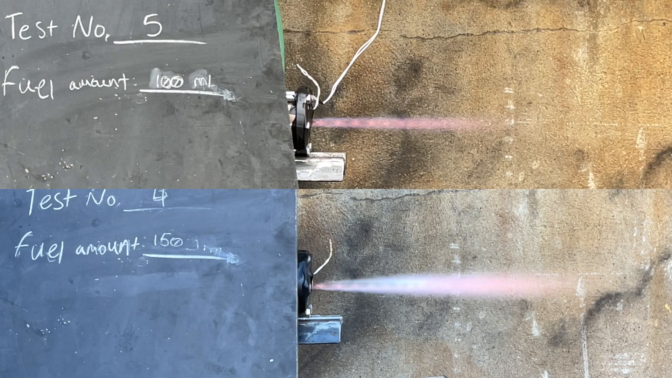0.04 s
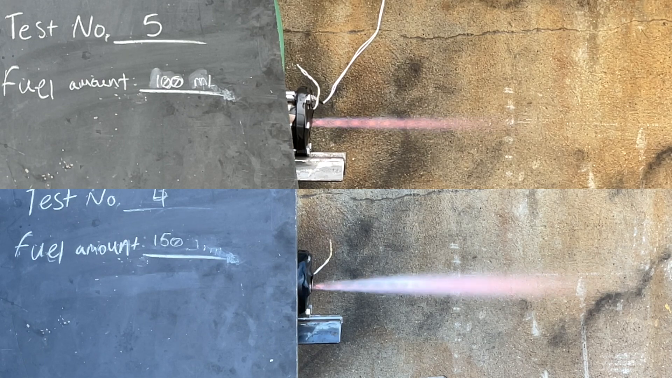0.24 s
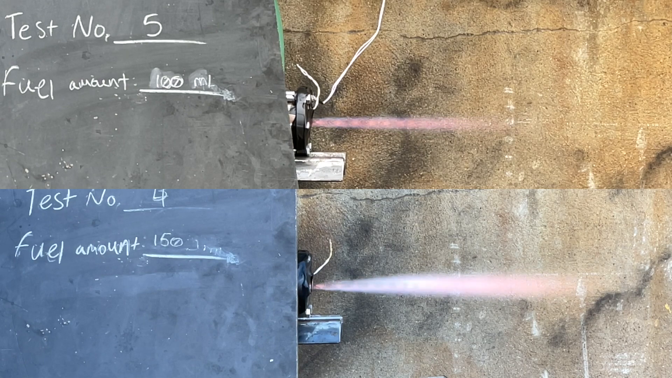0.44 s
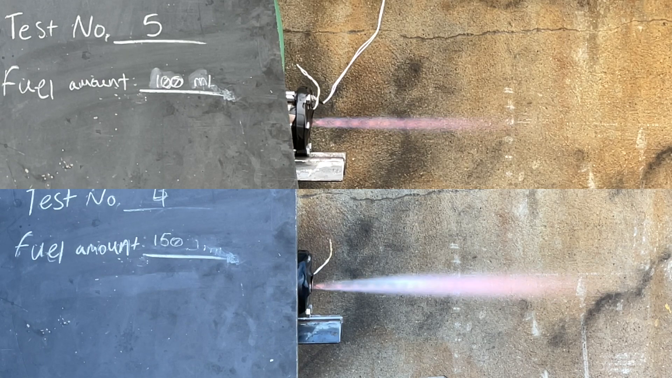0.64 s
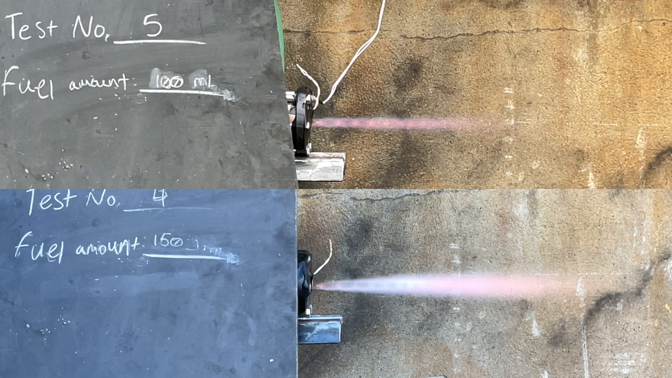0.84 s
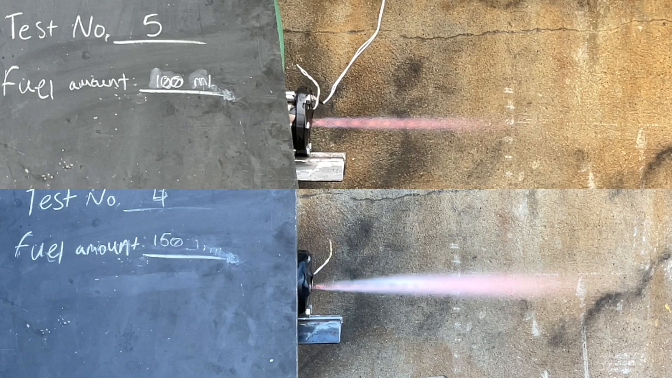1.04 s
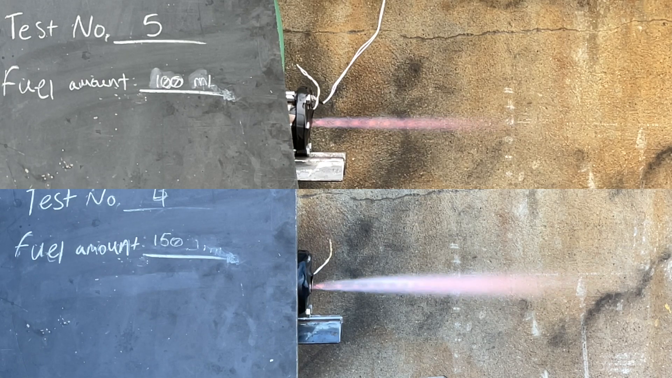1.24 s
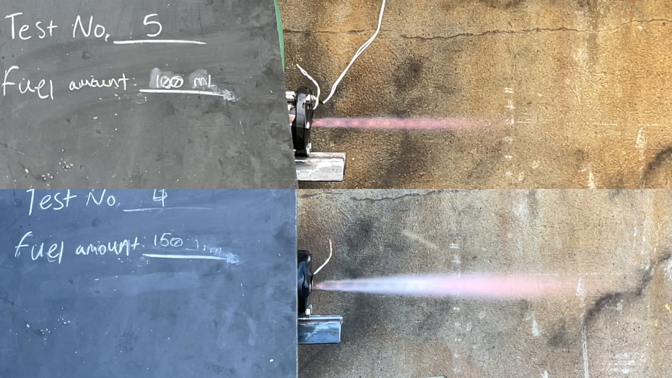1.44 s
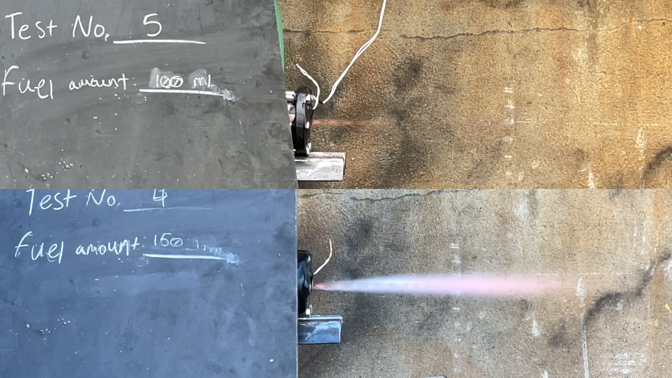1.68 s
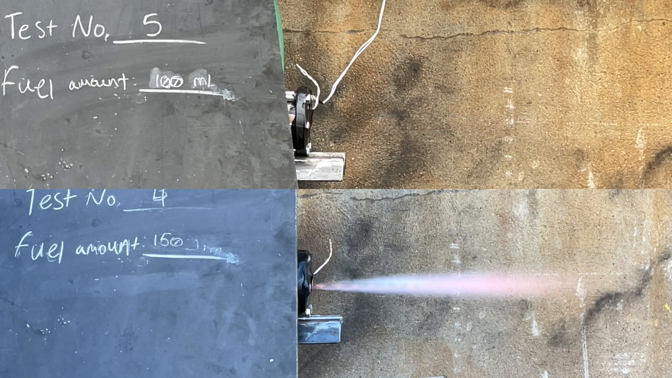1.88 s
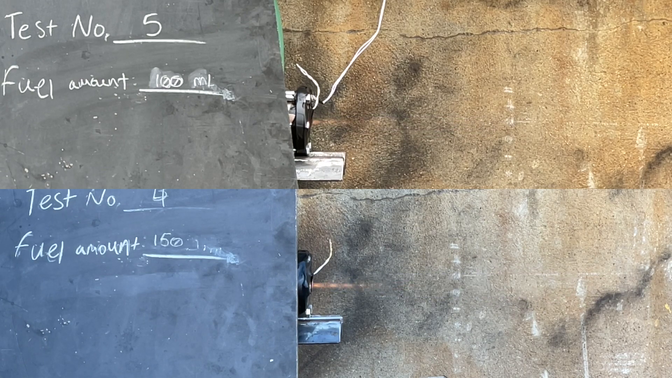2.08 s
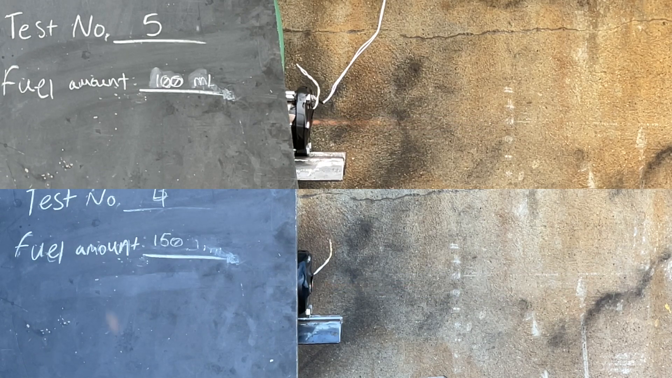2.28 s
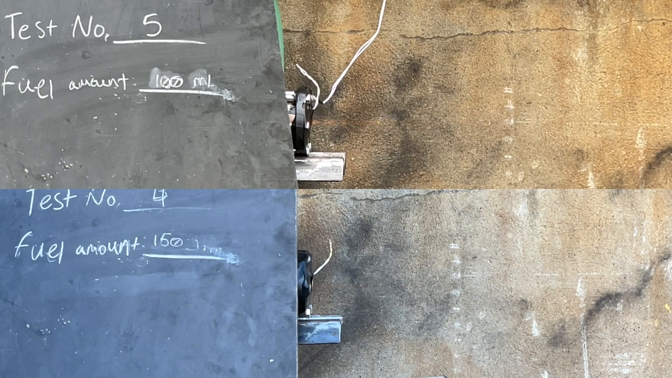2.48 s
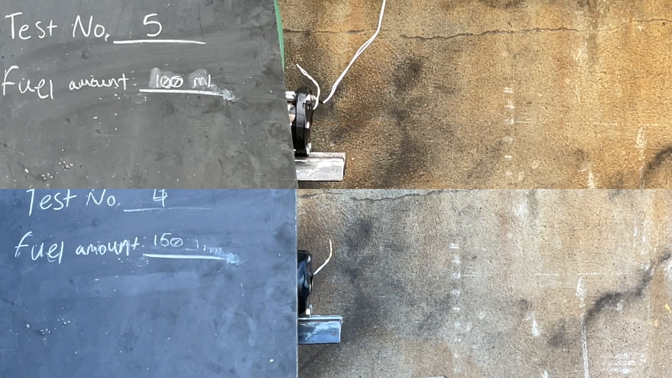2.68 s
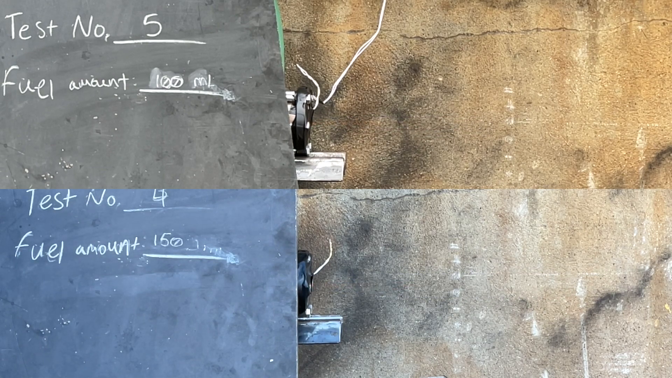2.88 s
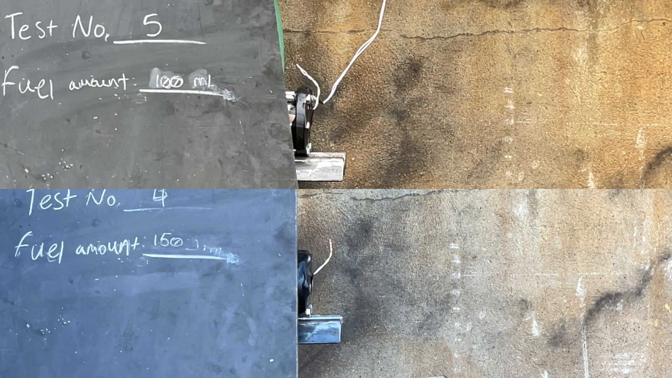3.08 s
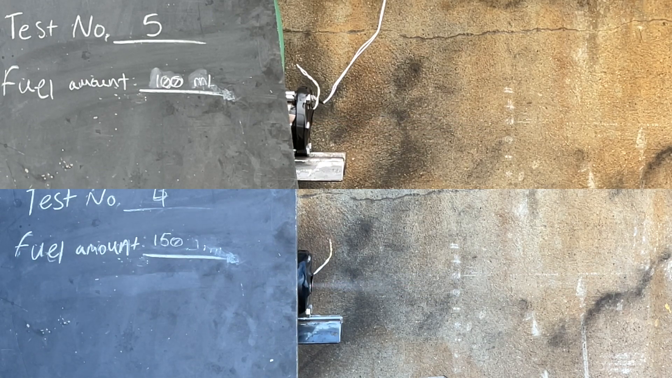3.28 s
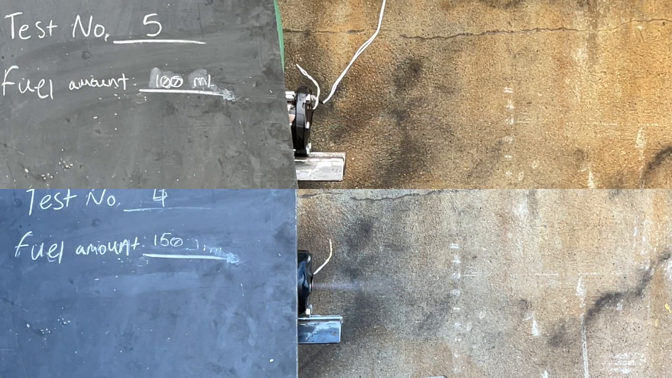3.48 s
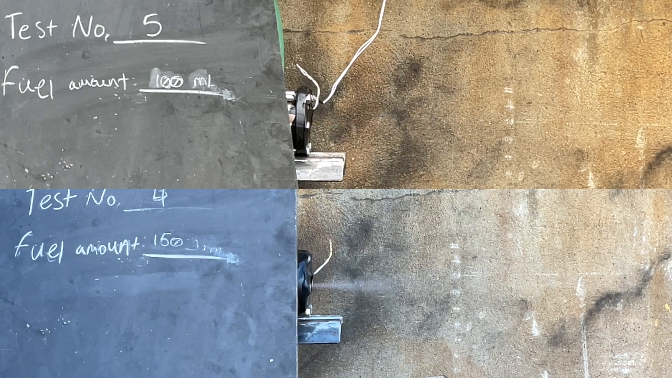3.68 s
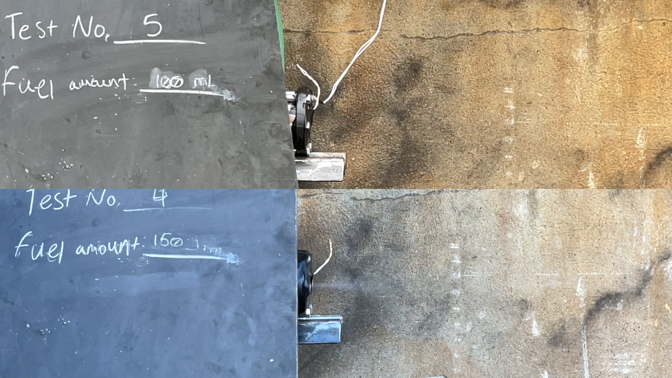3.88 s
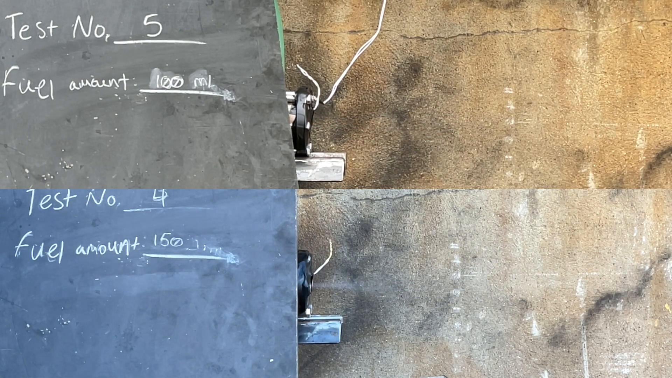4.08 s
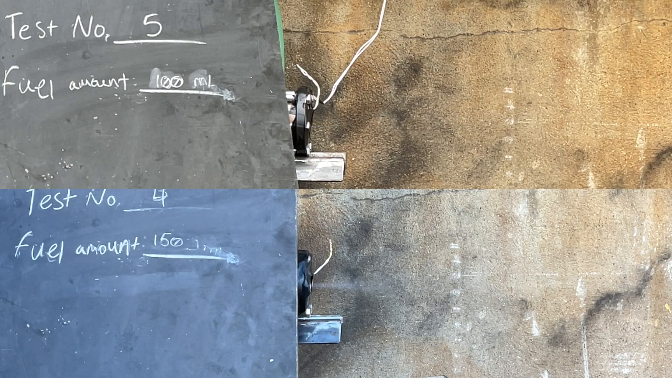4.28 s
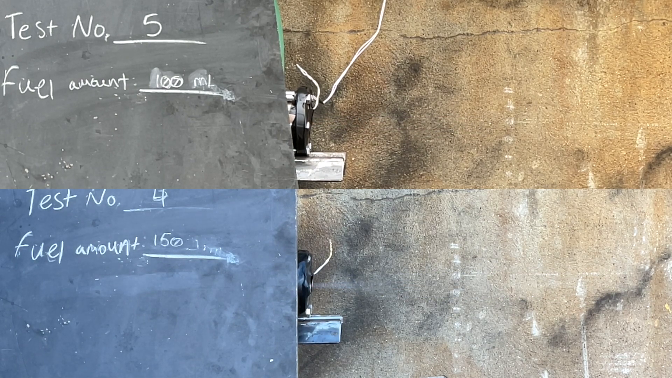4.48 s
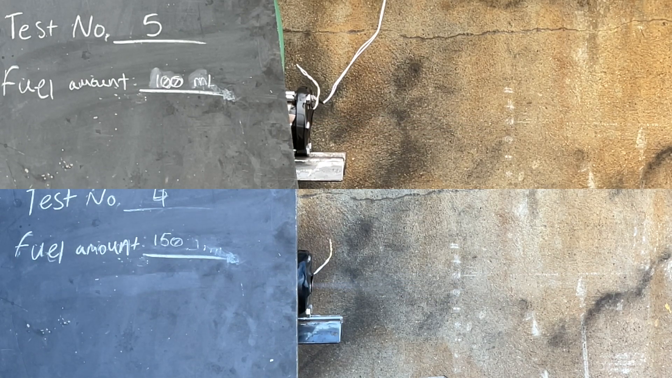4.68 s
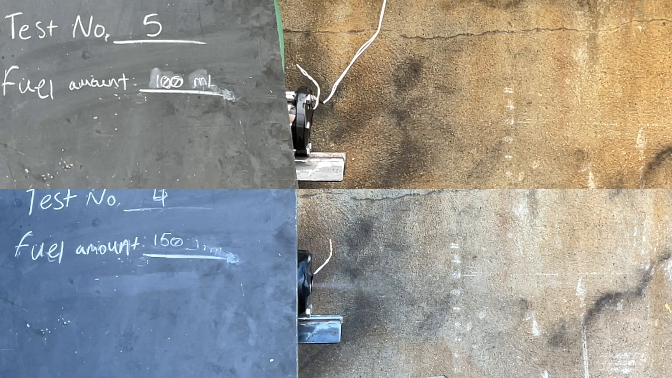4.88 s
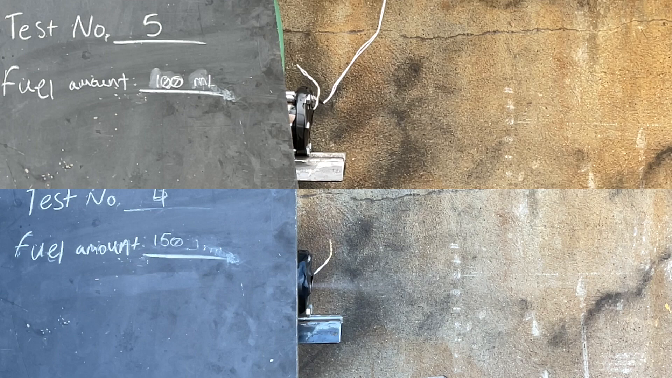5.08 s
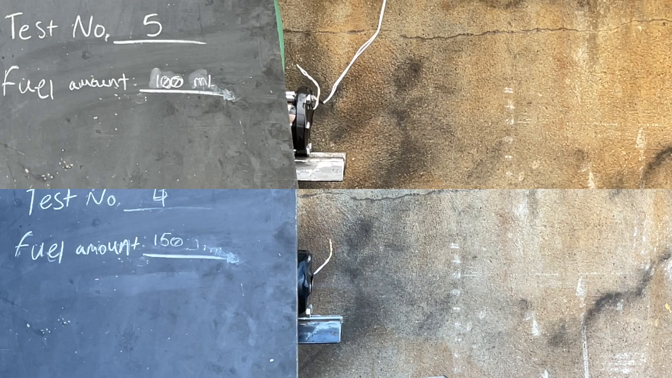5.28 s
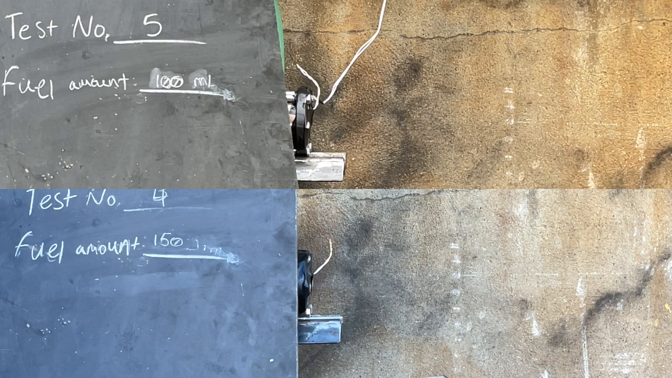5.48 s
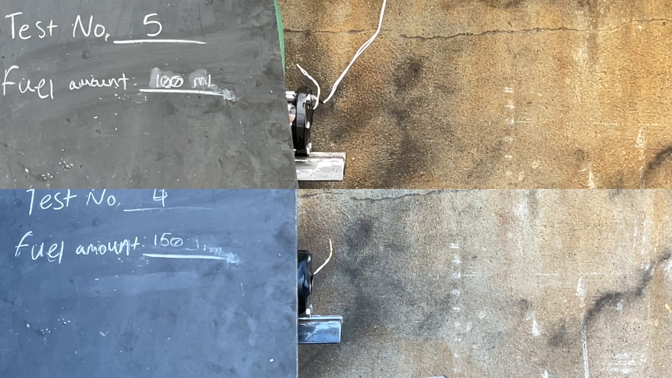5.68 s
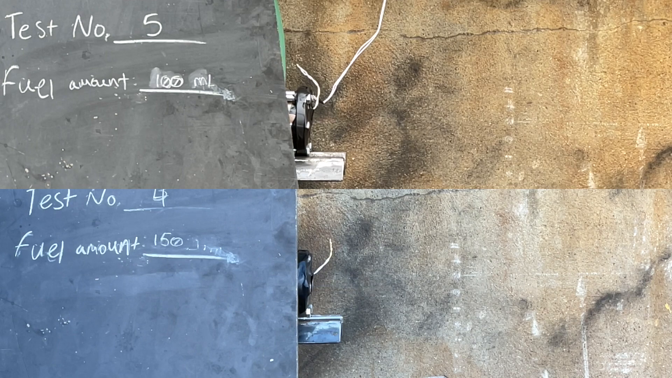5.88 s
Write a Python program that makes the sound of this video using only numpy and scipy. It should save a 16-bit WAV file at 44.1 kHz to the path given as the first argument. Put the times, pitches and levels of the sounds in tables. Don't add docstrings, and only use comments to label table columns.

```python
import sys
import numpy as np
from scipy import signal
from scipy.fft import rfft, irfft
from scipy.io import wavfile
from scipy.ndimage import uniform_filter1d

SR = 44100
rng = np.random.default_rng(int(sys.argv[2]) if len(sys.argv) > 2 else 0)


def gain_from_db(level_db):
    decades = np.asarray(level_db, float) / 20
    return 10 ** decades


def store_pcm(level_fs):
    pcm = np.round(np.clip(level_fs, -1, 1) * 32767).astype(np.int16)
    wavfile.write(sys.argv[1], SR, np.atleast_2d(pcm).T)


N = 261954
T = np.arange(N) / SR
HZ = np.fft.rfftfreq(N, 1 / SR)
FLAME_OUT_S, COOLING_S = 2.45, 0.37
HOT_JET_DB, COLD_JET_DB = -31.0, -32.5
KNEE_DB, SQUEEZE = -32.5, 1.38


def across(table, hz):
    table_hz, value = np.transpose(table)
    return np.interp(np.log(hz + 1), np.log(table_hz), value)


def walk(rate):
    hold = int(SR / rate)
    steps = rng.standard_normal(1000)[np.arange(N) // hold]
    return 0.82 * uniform_filter1d(uniform_filter1d(steps, hold), hold)


def shaped(x, gain):
    return irfft(rfft(x) * gain, N)


def rings(modes):
    return gain_from_db(sum(db / (1 + (2 * (HZ - hz) / width) ** 2) for hz, width, db in modes))


# frequency in Hz, part of the sound unlike at the two ports that is wall echo (0-1).
WALL_SHARE = [(100, 0.7), (1500, 0.65), (2500, 0.45), (4000, 0)]
WALL_LAG_S = 0.00438


def turbulence(colour, alike, throb_db, throb_rate, flicker_db, flicker_rate):
    shared, echo, left, right = rfft(rng.standard_normal((4, N)))
    likeness = np.clip(across(alike, HZ), 0, 1)
    wall = np.clip(across(WALL_SHARE, HZ), 0, 1)
    late = np.exp(-2j * np.pi * HZ * WALL_LAG_S)
    unlike = np.sqrt(wall) * np.array([echo * late, echo])
    unlike = unlike + np.sqrt(1 - wall) * np.array([left, right])
    ports = np.sqrt(likeness) * shared + np.sqrt(1 - likeness) * unlike
    ports = gain_from_db(across(colour, HZ)) * ports

    throb = throb_db * walk(throb_rate)
    octave = np.clip(np.log2((HZ + 1) / 30), 0, 8)
    out = 0
    for k in range(9):
        band = np.cos(np.pi / 2 * np.clip(octave - k, -1, 1)) ** 2
        out = out + gain_from_db(throb + flicker_db * walk(flicker_rate)) * irfft(ports * band, N)
    return out / np.sqrt(np.mean(out ** 2))


# time of the lowest feed in seconds, depth in dB, length of the slide down in seconds.
SAGS = [(1.86, 3, .14), (3.12, 1, .06), (3.371, 2.5, 0.23), (3.56, 1.9, 0.17), (3.84, 1.3, 0.27),
        (4.05, 2.0, .3), (4.44, 0.9, 0.1), (4.6, 1.5, 0.13), (4.87, 1.2, 0.11), (5.07, 1.5, .12),
        (5.2, 2.5, 0.18), (5.46, 2.5, 0.36), (5.58, 1.0, .06), (5.7, .8, 0.067)]
CATCH_UP_S = 0.05


def sags():
    return sum(db * np.interp(T, [s - slide, s, s + CATCH_UP_S], [0, 1, 0]) for s, db, slide in SAGS)


def jet_level(sag_db):
    return np.interp(T, [FLAME_OUT_S, FLAME_OUT_S + COOLING_S], [HOT_JET_DB, COLD_JET_DB]) - sag_db


# frequency in Hz, level in dB per Hz.
JET = [(30, -23.5), (100, -17.5), (300, -14), (700, -8.5), (1300, -5), (2200, -4), (3300, -1.5),
       (3800, -0.65), (5300, -0.04), (6300, -1.5), (7500, -6.5), (9500, -14.5), (14000, -20)]
# frequency in Hz, likeness of the two ports (0-1).
JET_ALIKE = [(100, 0), (500, 0.45), (2500, 0.31), (4000, 0.5), (5400, 0.74), (6500, 0.58), (7600, 0.86),
             (8300, 0.86), (9200, 0.28)]
EDGE_DB, EDGE_PER_JET = 1.5, 0.76


def gas_jet(jet_db):
    jet = turbulence(JET, JET_ALIKE, throb_db=0.5, throb_rate=7.7, flicker_db=0.38, flicker_rate=12)
    edge = shaped(jet, np.clip((HZ - 5500) / 2500, 0, 1))
    edge_gain = gain_from_db(EDGE_DB + EDGE_PER_JET * (jet_db - HOT_JET_DB))
    return gain_from_db(jet_db + 0.7) * (jet + (edge_gain - 1) * edge)


# time in seconds, flame roar in dB.
FIRE = [(0, -37.5), (1.42, -38.5), (1.65, -47.5), (1.82, -49), (1.92, -42.5), (2.1, -39), (2.41, -42),
        (2.7, -53.5), (2.95, -68)]
# time in seconds, peak in dB.
FLARES = [(3.01, -56), (3.46, -58.5), (3.63, -57.5), (4.18, -51.5), (4.71, -54), (5.54, -55), (5.8, -53)]
FLARE_S = 0.042
AFTERBURN_DB, AFTERBURN_PER_JET = -58, 3.6


def fire(sag_db):
    burn = gain_from_db(np.interp(T, *np.transpose(FIRE), right=-90))
    flares = sum(gain_from_db(db) * np.exp(-((T - s) / FLARE_S) ** 2) for s, db in FLARES)
    return burn + flares + gain_from_db(AFTERBURN_DB - AFTERBURN_PER_JET * sag_db)


# frequency in Hz, level in dB per Hz.
FLAME = [(20, 5), (40, 6), (100, 6.5), (200, 1), (600, 1.5), (900, -4), (2000, -5), (4000, -15),
         (10000, -14.5)]
# frequency in Hz, likeness of the two ports (0-1).
FLAME_ALIKE = [(30, 0.78), (150, 0.88), (330, 0.36), (700, 0.7), (1600, 0.97), (2500, 0.78), (8000, 0)]
# frequency in Hz, width in Hz, gain in dB.
CHAMBER = [(1240, 120, 6), (1916, 41, 8), (3170, 150, 13.5), (5500, 200, 7)]
STUMBLE_S, RELIT_DULL_DB, DULL_HZ = 1.6, -2, 250
SMOULDER_THIN_DB, THIN_HZ = -3, 45


def flame_roar(sag_db):
    roar = turbulence(FLAME, FLAME_ALIKE, throb_db=1.5, throb_rate=11, flicker_db=1.34, flicker_rate=8.4)
    flame = shaped(fire(sag_db) * gain_from_db(3.0) * roar, rings(CHAMBER))
    gone_s = FLAME_OUT_S + COOLING_S
    relit = np.interp(T, [STUMBLE_S, STUMBLE_S + 0.2, FLAME_OUT_S, gone_s], [0, 1, 1, 0])
    burnt_out = np.interp(T, [FLAME_OUT_S, gone_s], [0, 1])
    upper = shaped(flame, 1 / (1 + (DULL_HZ / (HZ + 1)) ** 2))
    flame = flame + (gain_from_db(RELIT_DULL_DB * relit) - 1) * upper
    deep = shaped(flame, 1 / (1 + (HZ / THIN_HZ) ** 4))
    return flame + (gain_from_db(SMOULDER_THIN_DB * burnt_out) - 1) * deep


# time in seconds, peak in dB, pitch in Hz.
POPS = [
    (1.976, -39.5, 60.5),
    (2.122, -33.5, 119),
    (2.392, -31.5, 34.7),
]


def pops():
    out = np.zeros(N)
    for s, db, hz in POPS:
        swing = np.sin(2 * np.pi * hz * (T - s))
        out += gain_from_db(db) * swing * np.exp(-((T - s) * hz / 0.68) ** 2)
    return out


# frequency in Hz, width in Hz, gain in dB.
STAND = [(268, 80, 3.5), (505, 71, 2), (740, 71, 3), (1223, 39, -2.5), (1640, 240, 2), (2490, 170, 1.5),
         (3700, 160, 0.5), (4220, 320, 1), (4780, 170, 1), (5280, 190, 1.5)]


def scene():
    sag_db = sags()
    jet_db = jet_level(sag_db)
    sources = gas_jet(jet_db) + flame_roar(sag_db) + pops()
    lost_db = (SQUEEZE - 1) * (jet_db - KNEE_DB) + 1.5
    balance_db = np.array([[0.1], [-0.1]])
    return shaped(sources, rings(STAND)) * gain_from_db(lost_db + balance_db)


def overload(x):
    ceiling, knee_hard = 0.047, 4.0
    x = x / ceiling
    return ceiling * x / (1 + np.abs(x) ** knee_hard) ** (1 / knee_hard)


# start in seconds, end in seconds, low edge in Hz.
FOLDS = [(1.8, 1.93, 7400), (2.55, 2.68, 7450), (2.68, 3.87, 6950), (4.65, 4.76, 7500), (4.92, 4.97, 7600),
         (5.2, 5.55, 7500), (5.64, 5.68, 7400)]
FOLD_TOP_HZ = 8250
ROUNDING = 0.3


def fold(x):
    mid_side = [(x[0] + x[1]) / 2, (x[0] - x[1]) / 2]
    hz, s, bins = signal.stft(mid_side, SR, nperseg=1024)
    grain = rng.standard_normal(bins.shape) + 1j * rng.standard_normal(bins.shape)
    bins = bins * (1 + ROUNDING * np.clip(hz / 1500, 0.3, 1)[:, None] * grain)
    for start, end, low in FOLDS:
        bins[1] *= ~np.outer((hz > low) & (hz < FOLD_TOP_HZ), (s > start) & (s < end))
    mid, side = signal.istft(bins, SR, nperseg=1024)[1][:, :N]
    return np.array([mid + side, mid - side])


def top_cut(x):
    return signal.sosfilt(signal.butter(12, 9720, fs=SR, output="sos"), x)


def record(dry):
    x = fold(overload(dry))
    x = shaped(x, (HZ > 15) & (HZ < 9680))
    return top_cut(x)


dry = scene()
out = record(dry)
store_pcm(out)
```